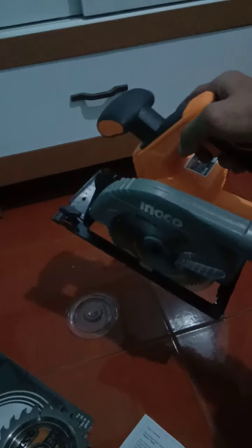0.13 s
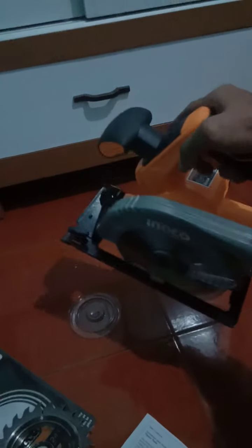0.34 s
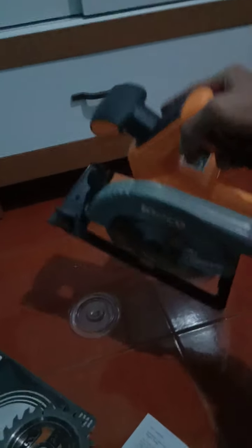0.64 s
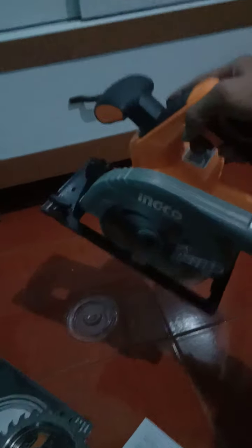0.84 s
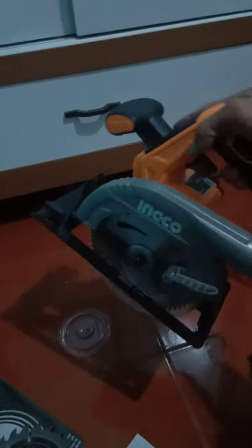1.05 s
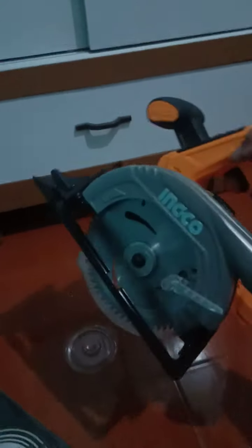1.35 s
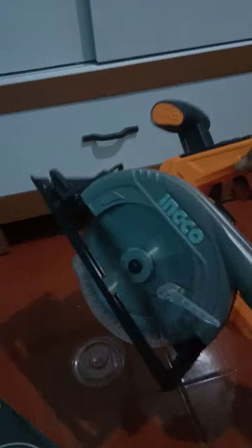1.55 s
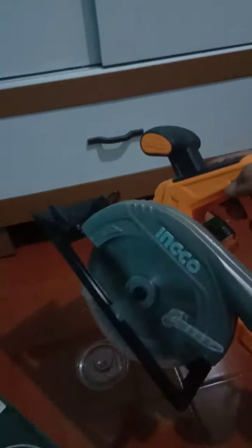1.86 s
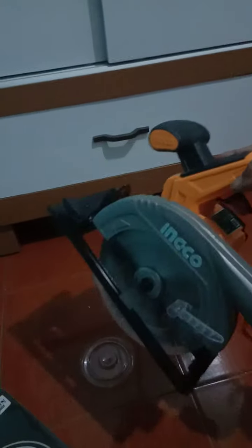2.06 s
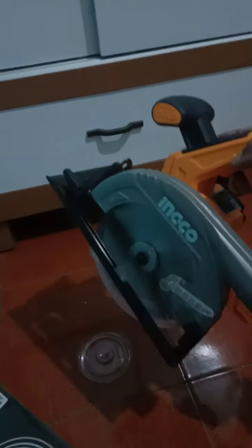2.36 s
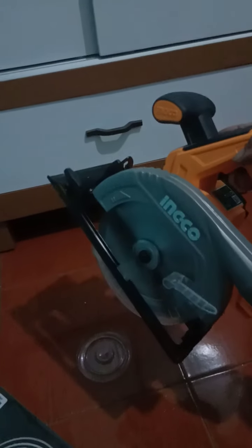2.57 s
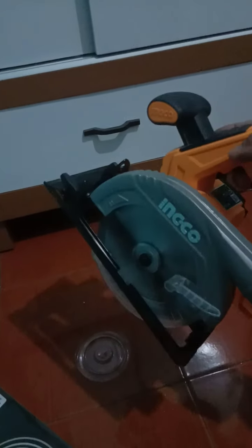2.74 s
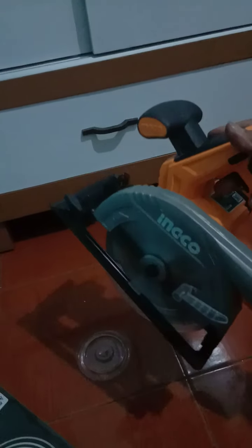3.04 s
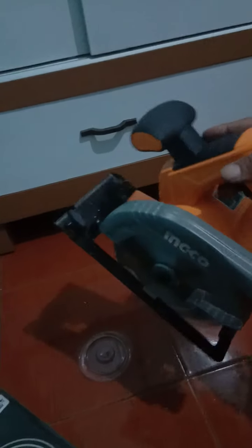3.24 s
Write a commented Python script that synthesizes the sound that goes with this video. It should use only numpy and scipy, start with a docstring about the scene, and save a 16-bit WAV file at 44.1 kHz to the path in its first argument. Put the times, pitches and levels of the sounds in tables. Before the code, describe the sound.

A handheld circular saw runs free, close to the microphone in a small tiled room: a click, a brief rough burst, a ringing metallic coast-down, another click, then a longer loud whine that brakes at the end.

```python
"""A cordless circular saw runs free, close by in a small tiled room: two pulls of the trigger.
Gears rattle as noise and knocks through the housing, under a whine of sines on motor orders and rough body bursts.
The brake squeaks, drops a falling tone and hums; the blade is left ringing in beating twin modes.
The switch clicks, the grip creaks, and faint hums, hiss and room rumble lie beneath.
Gain control pushes the rumble down while the saw runs."""
import sys
import numpy as np
from scipy import signal
from scipy.fft import rfft, irfft
from scipy.io import wavfile
from scipy.ndimage import uniform_filter1d

SR = 44100
rng = np.random.default_rng(int(sys.argv[2]) if len(sys.argv) > 2 else 0)


def store_pcm(level_fs):
    """Save levels as 16-bit WAV."""
    pcm = np.round(np.clip(level_fs, -1, 1) * 32767).astype(np.int16)
    wavfile.write(sys.argv[1], SR, np.atleast_2d(pcm).T)


def field_ratio(decibels):
    """Amplitude ratio for a level in dB (20 dB per decade); scalars and array-likes work."""
    return 10 ** (np.asarray(decibels, dtype=float) / 20)


N = 149940

# spectrum of the room rumble: (frequency [Hz], relative level [dB])
RUMBLE_SPECTRUM = [(15, -60), (25, -29), (108, 3), (317, -17), (438, -17), (1130, -19), (1290, -16.5),
                   (2410, -45), (3150, -14.5), (3910, -38), (16000, -99)]
RUMBLE_DB, HISS_DB = -43, -75.5
# faint hums: (start [s], end [s], frequency [Hz], width of each resonance pass [Hz], level [dB])
FAINT_HUMS = [(0.0, 0.108, 496, 7.6, -42), (0.604, 1.556, 433, 19, -54.5)]

# trigger clicks: (time [s], level [dB])
SWITCH_CLICKS = [(0.0228, -11.5), (1.516, -10.5)]
# creaks of the grip: (time [s], level [dB])
GRIP_CREAKS = [(1.2151, -40), (1.3159, -45), (1.3339, -52), (1.3813, -44), (1.4755, -44)]
# modes of the plastic grip: (frequency [Hz], level [dB], t60 [s])
GRIP_MODES = [(1250, -6, .008), (2100, -6, .006), (3200, -2, .006), (4600, -2, .004), (6100, -5, .004),
              (7500, 0, .005), (9500, -8, .003), (13000, -12, .002)]
CLICK_RISE_S, CREAK_RISE_S, CREAK_CUT_HZ = 0.0039, 0.0046, 3900
ROOM_T60_S, ROOM_DB, WALL_CUT_HZ, FIRST_ECHO_S = 0.28, -7, 7300, 0.0013

# trigger pulls: (motor start [s], brake [s])
TRIGGER_PULLS = [(.1212, .443), (1.5495, 3.18)]
FULL_HZ, SPIN_UP_S = 405.1, .115  # motor turns a second; time constant
GEAR_RATIO = 6.56  # motor turns per blade turn
BRAKE_HZ, BRAKE_DROP_S, BRAKE_SAG_HZ_PER_S = 225, .044, 100

# gear rattle over time: (time [s], level [dB], treble tilt above 2 kHz [dB per octave])
RATTLE_COURSE = [(0.118, -94, 17), (0.1219, 3.5, -8.5), (0.168, -3, 3), (.26, -3.5, 4), (.44, -2.5, 3),
                 (0.511, -8.5, 2), (0.608, -17.5, -4.5), (0.719, -30.5, -26), (.78, -48.5, -12.5),
                 (1.545, -47.5, -4.5), (1.549, -3, -7), (1.579, -4, -2), (1.63, -11.5, 3.5),
                 (1.75, -5, 2.5), (2.3, -9, 1), (2.8, -10.5, 0.5), (3.18, -9, 1), (3.268, -14.5, 0.5),
                 (3.4, -21.5, -8.5)]
# spectrum of the rattle through the housing: (frequency [Hz], relative level [dB])
HOUSING_SPECTRUM = [(120, -70), (200, -30.5), (359, -29), (401, -17), (432, -29.5), (850, -12.5),
                    (1140, -11.5), (1680, -1), (2200, -1), (3360, -8), (4190, -7), (5410, -18), (8100, -12),
                    (13500, -17.5), (16000, -17)]
# resonances of the housing shell: (frequency [Hz], width [Hz], relative strength [dB])
SHELL_MODES = [(1252, 85, -3), (1710, 130, -15), (2680, 1120, -8), (4216, 710, -9.5), (5760, 51, -6.5),
               (6240, 640, -6), (6480, 1800, -0.5), (8140, 860, -7.5), (13000, 640, -5)]
KNOCKS_PER_S, KNOCK_SHARE, KNOCK_DECAY_S, KNOCK_SPREAD_DB = 400, .28, .001, 3.0  # share of power
WOBBLE_DB, PATCHY_DB, SURGE_DB = 2.5, 2, 2.14

# rough noise bursts while starting, running and stopping:
# (time [s], length [s], low body tone [dB], high body tone [dB])
BODY_BURSTS = [(0.12, 0.012, -13, 0.5), (0.143, 0.024, -28, 1.5), (0.186, 0.026, -21, 6),
               (0.248, 0.036, -36, -9), (0.317, 0.094, -28, -1.5), (0.409, 0.1, -36, -2.5),
               (0.544, .02, -38, -6.5), (0.688, 0.034, -31.5, -45.5), (1.545, 0.0097, -8.5, -16),
               (1.567, 0.037, -11.5, -8), (1.617, 0.043, -19, -4.5), (1.64, 0.024, -12.5, -14),
               (3.239, 0.034, -39, -10)]
# the two body tones: (frequency [Hz], width of each resonance pass [Hz])
BODY_TONES = [(1300, 310), (2420, 450)]

# whine partials: (multiple of the motor speed [ratio])
MOTOR_ORDERS = [1, 4, 4.305, 4.845, 5, 5.296, 5.369, 5.753, 6.536, 7.142, 7.481, 9.046, 10, 15]
# the same partials: (level relative to the rattle's level [dB])
ORDER_DB = [-41, -11, -13, -17, -13, -13, -8, -15, -16, -17, -14, -17, -18, -14]
WHINE_FLICKER_DB, WHINE_FLICKER_RATE, WHINE_WANDER = 2.5, 3.0, .0006  # wander: share of full speed

# sounds at each brake: (squeak [dB], falling tone [dB], hum [dB])
BRAKE_LEVELS = [(-3, -30, -30), (-8, -5, -33)]
START_SQUEAK_S, START_SQUEAK_DB = 1.548, -18
SQUEAK_HZ, SQUEAK_WIDTH_HZ, SQUEAK_S = 14100, 2300, 0.01
FALL_ORDER, FALL_S, FALL_SKEW, FALL_ROUGH_DB = 10.6, .046, 2.4, 4.0  # order: multiple of motor speed
HUM_HZ, HUM_WIDTH_HZ, HUM_S = 268, 39, .16

# blade modes: (frequency [Hz])
MODE_HZ = [1242, 1309, 1801, 1841, 2202, 2579, 2681, 2757, 3022, 3087, 3277, 3659, 4710, 4797, 6631, 6780,
           8528, 8563, 8700, 10560, 12420, 14000, 15230]
# the same modes: (after first stop [dB], after second stop [dB], t60 [s], twin's offset [Hz],
# twin's share of the amplitude, negative when flipped [ratio])
MODE_RING = [(-41.5, -61, 7.5, 1.1, 0.31), (-40, -43, 9.8, 1.34, 0.66), (-16, -25.5, 0.72, 0.33, -0.46),
             (-27, -30.5, 0.99, 1.4, 1), (-31.5, -37.5, 2.6, 0.66, .8), (-38.5, -28, 2.3, 2.6, 0.61),
             (-37.5, -19, 1.7, 1.0, 0.33), (-17.5, -29, 1.5, 1.07, 0.66), (-28, -31, 1.6, 0.64, 1),
             (-22, -35, 3.66, 1.026, -0.91), (-16, -11, 1.83, 1.35, -0.59),
             (-29.5, -33.5, 2.25, 0.38, 0.39), (-34.5, -52, 1.4, 1.6, -.5), (-25, -33.5, 0.97, 1.4, 0.67),
             (-26, -42, 1.06, 1.88, -.85), (-28, -31, 0.29, 1.0, -0.51), (-25.5, -21, 1.05, 3.7, -0.44),
             (-20.5, -40, 0.54, 1.0, 0.25), (-22.5, -46, 0.38, 1.0, -0.061), (-40.5, -48, 0.93, 4.0, .4),
             (-41, -45, .4, 1.0, -0.0092), (-48, -52, 0.16, 1.17, .1), (-45, -31.5, 0.38, 1.0, 0.27)]
RING_AFTER_S, RING_RISE_S = .17, .09  # the ring is fully in this long after the brake

SIDE_DB, SIDE_CUT_HZ = -34.5, 3840
THRESHOLD_DB, SQUEEZE, LOOK_AHEAD_S, SENSE_S = -18, 0.8, 0.0084, 0.031  # squeeze: dB cut per dB over
SENSED_FALL_DB_PER_S = 88
PEAK_TOP, PEAK_KNEE = .7, 4
TOP_CUT_HZ = 15500


def rms_one(x):
    """Scales to rms 1."""
    return x / np.sqrt(np.mean(x ** 2) + 1e-20)


def at_hz(points, hz):
    """Reads a spectrum table along log frequency."""
    table = np.array(points)
    return np.interp(np.log(hz), np.log(table[:, 0]), table[:, 1])


def drift(rate):
    """Slow random wander of spread 1, quicker for a higher rate; low-passed noise."""
    r = np.exp(-80 * np.pi * rate / SR)
    noise = rng.standard_normal(N // 40 + 2002)  # one point every 40 samples
    slow = signal.lfilter([1], [1, -2 * r, r * r], noise)[2000:]
    return np.interp(np.arange(N) / 40, np.arange(len(slow)), rms_one(slow - slow.mean()))


def coloured(x, points):
    """Shapes x with a spectrum table."""
    hz = np.maximum(np.arange(N // 2 + 1) * SR / N, 1)
    return irfft(rfft(x) * field_ratio(at_hz(points, hz)), N)


def resonance(x, hz, width_hz):
    """Two-pole resonance, gain 1 on top."""
    r = np.exp(-np.pi * width_hz / SR)
    gain = (1 - r * r) / 2
    return signal.lfilter([gain, 0, -gain], [1, -2 * r * np.cos(2 * np.pi * hz / SR), r * r], x + 1e-18)


def narrow(hz, width_hz):
    """Noise twice through one resonance, rms 1."""
    once = resonance(rng.standard_normal(N), hz, width_hz)
    return rms_one(resonance(once, hz, width_hz))


def swell(u, skew):
    """Rises and falls as u runs from 0 to 1; a skew below 1 peaks early."""
    return np.abs(np.sin(np.pi * np.clip(u, 0, 1) ** skew)) ** .5 * (u < 1) * (u > 0)


def rumble():
    """Room rumble: coloured noise whose level drifts gently."""
    noise = rms_one(coloured(rng.standard_normal(N), RUMBLE_SPECTRUM))
    return field_ratio(RUMBLE_DB + 1.0 * drift(1.7)) * noise


def hiss():
    """Steady faint white noise."""
    return field_ratio(HISS_DB) * rng.standard_normal(N)


def faint_hums():
    """Wavering hums: narrow noise bands, each held for a stretch."""
    t = np.arange(N) / SR
    return sum(field_ratio(db) * narrow(hz, width) * (t >= start) * (t < end)
               for start, end, hz, width, db in FAINT_HUMS)


def plastic(events, rise_s):
    """Short scratchy contacts ring the plastic grip: noise bursts into decaying two-pole modes."""
    t, drive, out = np.arange(N) / SR, 0, 0
    for time, db in events:
        u = np.maximum(t - time, 0) / rise_s
        drive = drive + field_ratio(db - 21) * u * np.exp(1 - u) * (u < 1.5)
    for hz, db, t60 in GRIP_MODES:
        r, w = field_ratio(-60 / (t60 * SR)), 2 * np.pi * hz / SR
        scratch = field_ratio(db) * drive * rng.standard_normal(N)
        out = out + signal.lfilter([0, np.sin(w)], [1, -2 * r * np.cos(w), r * r], scratch + 1e-18)
    return out


def room(x):
    """Tiled room: a dense noise tail whose treble dies faster, so it dulls with time."""
    t = np.arange(int(.6 * SR)) / SR
    white = rng.standard_normal(len(t))
    dull = signal.sosfilt(signal.butter(2, WALL_CUT_HZ, fs=SR, output="sos"), white)
    decay = field_ratio(-60 * t / ROOM_T60_S)
    tail = (dull + (white - dull) * decay) * decay * (t > FIRST_ECHO_S)
    return signal.fftconvolve(x, tail / np.sqrt(np.sum(tail ** 2)))[:N]


def motor_hz():
    """Motor speed climbs exponentially after each start, drops at the brake, then sags."""
    t, hz = np.arange(N) / SR, np.zeros(N)
    for start, brake in TRIGGER_PULLS:
        up = FULL_HZ * (1 - np.exp(-np.clip(t - start, 0, brake - start) / SPIN_UP_S))
        after = np.maximum(t - brake, 0)
        low = np.maximum(BRAKE_HZ - BRAKE_SAG_HZ_PER_S * after, 0)
        braked = 1 - np.clip(1 - after / BRAKE_DROP_S, 0, 1)
        hz = np.where(t >= start, up + (low - up) * braked, hz)
    return hz


def rattle(turns):
    """Air noise and tooth knocks, wobbling once per blade turn, through the housing in patchy third octaves."""
    s, db, tilt = np.transpose(RATTLE_COURSE)
    t = np.arange(N) / SR
    db, tilt = np.interp(t, s, db), np.interp(t, s, tilt)
    hit_level = field_ratio(KNOCK_SPREAD_DB * np.minimum(rng.exponential(1, N), 3))
    hits = (rng.random(N) < KNOCKS_PER_S / SR) * hit_level
    envelope = signal.lfilter([1], [1, -np.exp(-1 / (KNOCK_DECAY_S * SR))], hits)
    knocks = rms_one(envelope * rng.standard_normal(N))
    drive = np.sqrt(1 - KNOCK_SHARE) * rng.standard_normal(N) + np.sqrt(KNOCK_SHARE) * knocks
    wobble = WOBBLE_DB * np.cos(2 * np.pi * turns / GEAR_RATIO + 0.9 * drift(5.1))
    drive = drive * field_ratio(wobble + SURGE_DB * drift(17))
    shell = sum(field_ratio(g) * 2 * resonance(drive, hz, width) for hz, width, g in SHELL_MODES)
    drive = rms_one(coloured(drive + shell, HOUSING_SPECTRUM))
    spectrum, hz, out = rfft(drive), np.arange(N // 2 + 1) * SR / N, 0
    for centre in 200 * 2 ** (np.arange(20) / 3):
        band = irfft(spectrum * np.clip(1 - 3 * abs(np.log2(hz / centre + 1e-9)), 0, 1), N)
        out = out + band * field_ratio(tilt * np.log2(max(centre, 2000) / 2000) + PATCHY_DB * drift(12))
    return out * field_ratio(db), db


def body_bursts():
    """Rough noise bursts in two body tones, each narrow noise under a swell that peaks early."""
    t = np.arange(N) / SR
    low, high = [narrow(hz, width) for hz, width in BODY_TONES]
    return sum(swell((t - s) / length, 0.28) * (field_ratio(low_db) * low + field_ratio(high_db) * high)
               for s, length, low_db, high_db in BODY_BURSTS)


def whine(turns, rattle_db):
    """Flickering sines on multiples of the motor speed, fading in while driven and out at the brake."""
    t, out = np.arange(N) / SR, 0
    driven = sum(np.clip((t - start) / 0.66, 0, 1) * np.clip(1 - (t - brake) / 0.0077, 0, 1)
                 for start, brake in TRIGGER_PULLS)
    turns = turns + np.cumsum(drift(5.2)) * WHINE_WANDER * FULL_HZ / SR
    for order, db in zip(MOTOR_ORDERS, ORDER_DB):
        level = field_ratio(db + WHINE_FLICKER_DB * drift(WHINE_FLICKER_RATE))
        out = out + level * np.sin(2 * np.pi * (order * turns + rng.random()))
    return driven * field_ratio(rattle_db) * out


def brakes(turns):
    """Noise squeak, tone falling with the motor and rough hum at each brake; a squeak at the second start."""
    t = np.arange(N) / SR
    squeak, hum = narrow(SQUEAK_HZ, SQUEAK_WIDTH_HZ), narrow(HUM_HZ, HUM_WIDTH_HZ)
    falling = np.sin(2 * np.pi * FALL_ORDER * turns)
    out = field_ratio(START_SQUEAK_DB) * squeak * swell((t - START_SQUEAK_S) / SQUEAK_S, 0.34)
    for (start, brake), (squeak_db, fall_db, hum_db) in zip(TRIGGER_PULLS, BRAKE_LEVELS):
        u = np.maximum(t - brake, 0)
        out = out + field_ratio(squeak_db) * squeak * u / SQUEAK_S * np.exp(1 - u / SQUEAK_S)
        out = out + field_ratio(fall_db + FALL_ROUGH_DB * drift(150)) * swell(u / FALL_S, FALL_SKEW) * falling
        out = out + field_ratio(hum_db) * swell(u / HUM_S, 0.21) * hum
    return out


def blade():
    """As the blade stops its modes swell and ring, each beating with a close twin; the next start ends them."""
    t, out = np.arange(N) / SR, 0
    for k, (start, brake) in enumerate(TRIGGER_PULLS):
        u = t - brake - RING_AFTER_S
        end = TRIGGER_PULLS[k + 1][0] if k + 1 < len(TRIGGER_PULLS) else np.inf
        gate = np.clip(1 + u / RING_RISE_S, 0, 1) * np.clip((end - t) / .05 + 1, 0, 1)
        live = gate > 0
        v, ring = u[live], np.zeros(N)
        for hz, (*stop_db, t60, offset, share) in zip(MODE_HZ, MODE_RING):
            phase = 2 * np.pi * (hz * v + rng.random())
            pair = np.sin(phase) + share * np.sin(phase + 2 * np.pi * offset * v)
            ring[live] += field_ratio(stop_db[k] - 60 * v / t60) * pair
        out = out + gate * ring
    return out


def creaks():
    """Creaks of the grip: plastic contacts with the lows cut."""
    high_pass = signal.butter(2, CREAK_CUT_HZ, "high", fs=SR, output="sos")
    return signal.sosfilt(high_pass, plastic(GRIP_CREAKS, CREAK_RISE_S))


def scene():
    """Saw, grip, room and rumble, almost alike on both sides."""
    turns = np.cumsum(motor_hz()) / SR
    gears, rattle_db = rattle(turns)
    saw = plastic(SWITCH_CLICKS, CLICK_RISE_S) + gears + body_bursts() + brakes(turns) + creaks()
    mid = saw + field_ratio(ROOM_DB) * room(saw) + whine(turns, rattle_db) + blade()
    mid = mid + faint_hums() + hiss() + rumble()
    # the sides differ by a faint, late, treble-only copy
    high_pass = signal.butter(4, SIDE_CUT_HZ, "high", fs=SR, output="sos")
    side = field_ratio(SIDE_DB) * signal.sosfilt(high_pass, np.roll(mid, 90))
    return np.array([mid + side, mid - side])


def gain_control(x):
    """Turns loud stretches down, looking ahead and letting go steadily."""
    level = 10 * np.log10(uniform_filter1d(x.mean(axis=0) ** 2, int(SENSE_S * SR)).clip(1e-12))
    ramp = SENSED_FALL_DB_PER_S * np.arange(N) / SR
    held = np.maximum.accumulate(level + ramp) - ramp  # level that falls no faster than the ramp
    cut = SQUEEZE * np.maximum(held - THRESHOLD_DB, 0)
    ahead = int(LOOK_AHEAD_S * SR)
    cut = np.maximum(cut, np.append(cut[ahead:], cut[-ahead:]))
    return x * field_ratio(-uniform_filter1d(cut, int(0.0022 * SR)))


def rounded(x):
    """Soft limit that rounds off chiefly the highest peaks."""
    return x / (1 + np.abs(x / PEAK_TOP) ** PEAK_KNEE) ** (1 / PEAK_KNEE)


def top_cut(x):
    """Nothing passes above the cut-off."""
    return signal.sosfilt(signal.butter(12, 16100, fs=SR, output="sos"), x)


def record(dry):
    """Gain control, rounded peaks and a steeply cut top."""
    low_pass = signal.ellip(10, .5, 50, TOP_CUT_HZ, fs=SR, output="sos")
    mix = signal.sosfilt(low_pass, rounded(gain_control(dry)))
    return top_cut(mix)


dry = scene()
out = record(dry)
store_pcm(out)
```